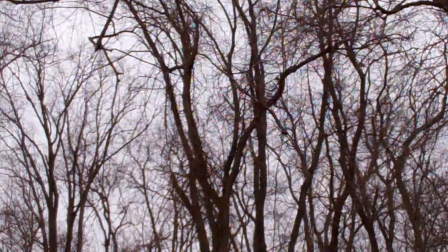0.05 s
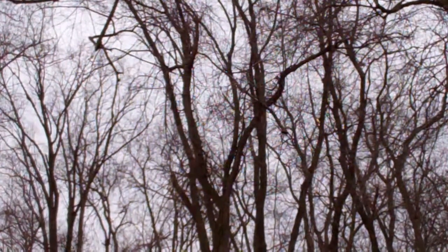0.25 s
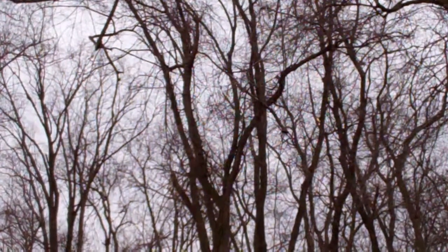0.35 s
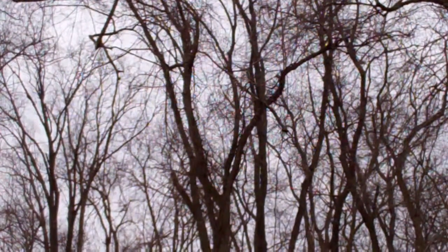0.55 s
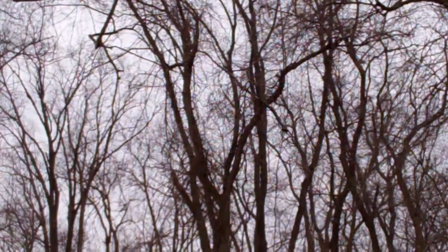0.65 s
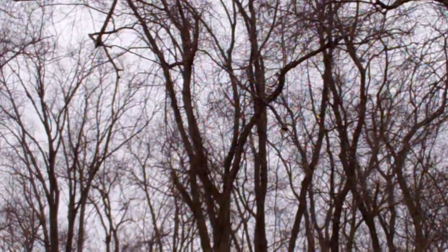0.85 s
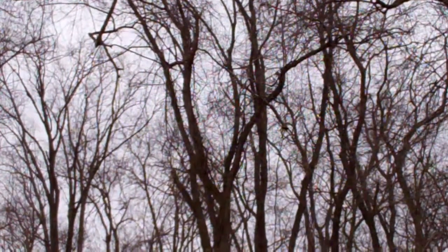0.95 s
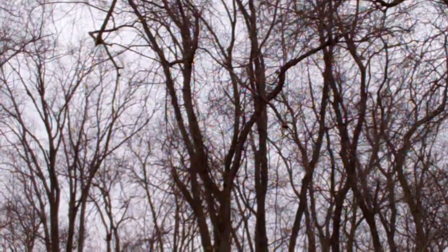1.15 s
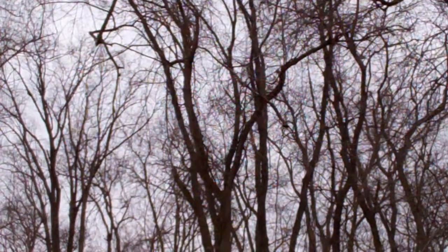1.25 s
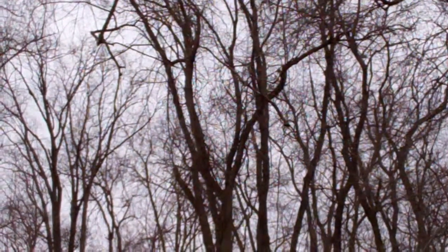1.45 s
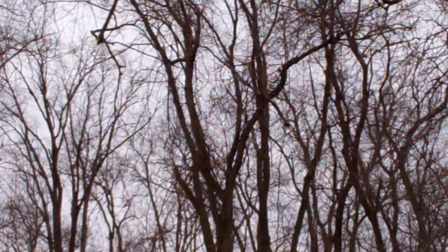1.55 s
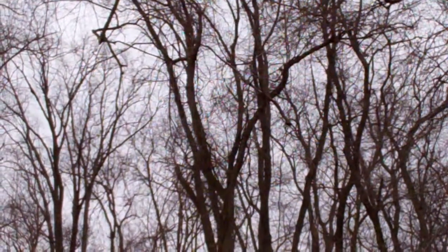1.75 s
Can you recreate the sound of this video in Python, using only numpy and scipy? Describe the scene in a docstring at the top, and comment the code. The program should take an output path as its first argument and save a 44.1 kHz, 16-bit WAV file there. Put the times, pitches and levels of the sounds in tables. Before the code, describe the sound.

A sharp plastic knock close to the microphone, over steady hiss and distant traffic, with faint birds

```python
"""A bare winter wood: traffic drone, microphone hiss and a thin whine run throughout, far bird notes now and then.
A seep and a faint chirp (bent sines) open; a tiny tick (noise burst) follows, then a knock on a hand-held
camera's plastic shell (driven resonances, ringing thin parts, noise cracks). A hoarse falling whistle
(fluttering sine) comes next; a far hollow tap (damped sines) falls within it. Then most of the chirps
and seeps call; the trunks echo every bird."""
import sys
import numpy as np
from scipy import signal
from scipy.fft import rfft, irfft, next_fast_len
from scipy.io import wavfile
from scipy.ndimage import uniform_filter1d, map_coordinates

SR = 44100
rng = np.random.default_rng(int(sys.argv[2]) if len(sys.argv) > 2 else 0)


def gain_from_db(level_db):
    """Turn a decibel level (scalar or array-like) into a linear amplitude factor."""
    decades = np.asarray(level_db, float) / 20
    return 10 ** decades


def store_pcm(level_fs):
    """Save levels as 16-bit WAV."""
    pcm = np.round(np.clip(level_fs, -1, 1) * 32767).astype(np.int16)
    wavfile.write(sys.argv[1], SR, np.atleast_2d(pcm).T)


N = 79380

# Broad shell resonances. Each row: centre in Hz, width in Hz, left gain in dB, right port over left in dB.
SHELL_MODES = [(340, 390, -13.5, -9), (693, 190, -22, -5.5)]
# Thin parts of the shell. Each row: pitch in Hz, left level in dB, t60 in s, right port over left in dB,
# relative sign of the first swing.
THIN_PARTS = [(1385, -36.5, .026, -1, 1), (1710, -38, .018, -7, 1), (2130, -33, .007, -8, -1),
              (3100, -43, .006, -2, 1), (4380, -42, .008, -9, 1), (5150, -37, .011, -12, -1),
              (5520, -41, .009, -12, 1), (12900, -31.5, .007, -15, 1), (13450, -32.5, .009, -15, -1),
              (13900, -38, .009, -15, 1), (14600, -37, .005, -15, -1)]
# Brittle cracks by the left port. Each row: time in s, relative peak level in dB, t60 in s, left over right in dB.
CRACKS = [(.0892, -39, .006, 14), (.2360, -32, .008, 14), (.2378, -43, .03, 10)]
# Crack spectrum. Each row: frequency in Hz, relative level in dB.
CRACK_SPECTRUM = [(1500, -10), (3000, -9), (3600, -16), (4300, -7), (5900, -9), (7000, -5), (7900, -10),
                  (8700, -4), (9800, -3), (10700, -9), (12300, -4), (13300, -3), (14300, -12), (15000, -13),
                  (15500, -40), (16000, -70)]
# Wooden modes of the tap. Each row: pitch in Hz, peak level in dB, t60 in s.
TAP_MODES = [(655, -41.5, .014), (930, -50, .01), (1300, -55, .006), (1840, -57, .006), (2440, -55, .006),
             (3000, -59, .004)]
# Whistle line. Each row: time in s, pitch in Hz, relative level in dB.
WHISTLE_LINE = [(.322, 3520, -72), (.355, 3535, -64), (.375, 3530, -67), (.4, 3470, -60), (.44, 3430, -60),
                (.485, 3395, -56), (.51, 3375, -63), (.545, 3360, -61), (.575, 3335, -56), (.6, 3310, -63),
                (.65, 3320, -62), (.7, 3270, -62), (.73, 3290, -70), (.76, 3290, -74), (.81, 3270, -67),
                (.87, 3330, -72)]
# Chirps. Each row: start in s, length in s, first, middle and last pitch in Hz, relative level in dB.
CHIRPS = [(.853, .018, 2550, 2350, 2600, -65), (.869, .018, 2600, 3050, 3550, -65),
          (.885, .025, 3580, 3600, 3400, -60), (.911, .025, 3450, 3600, 3350, -60),
          (.897, .036, 2950, 2750, 2950, -62), (.931, .01, 3000, 3170, 3450, -55),
          (.937, .014, 3450, 4150, 4600, -60), (.949, .024, 3800, 3980, 3600, -62),
          (.952, .016, 3000, 3300, 3500, -63), (.976, .02, 3850, 3950, 3900, -72),
          (.897, .027, 6500, 6200, 5730, -63), (.922, .015, 5720, 5900, 6550, -61),
          (.895, .025, 5800, 5650, 5700, -69), (1.268, .055, 2750, 3480, 3350, -62),
          (1.268, .022, 3500, 3750, 3850, -66), (1.292, .022, 4100, 4300, 4250, -67),
          (1.752, .034, 3550, 3350, 3200, -68), (1.78, .034, 3150, 3650, 4050, -65),
          (.07, .018, 3450, 3500, 3450, -70), (1.322, .035, 3450, 3400, 3300, -68)]
# Thin high seeps. Each row: start in s, length in s, first, middle and last pitch in Hz, relative level in dB.
SEEPS = [(.001, .011, 6000, 7300, 8200, -60), (.912, .011, 6500, 7550, 8350, -59),
         (1.488, .045, 8900, 8000, 7500, -64), (1.498, .047, 9500, 9350, 9100, -67),
         (1.52, .045, 9200, 8700, 8100, -62), (1.527, .018, 9400, 9000, 8500, -63),
         (1.708, .014, 7250, 7200, 7150, -70), (.52, .008, 7900, 7700, 7800, -66),
         (.528, .015, 9000, 11600, 10900, -63), (.532, .011, 11500, 13000, 12000, -63)]
# Overall gain in dB: chirps, seeps, whistle.
BIRD_GAIN_DB = [.5, .3, 1.2]
# Drone spectrum. Each row: frequency in Hz, relative level per Hz in dB.
DRONE_SPECTRUM = [(12, -35), (20, -16), (60, -11), (100, -7.5), (125, -3.5), (170, -6.5), (250, -7),
                  (399, -7.5), (460, -5.5), (520, -7.5), (678, -3.5), (850, -5.5), (1040, -8),
                  (1410, -12.5), (1560, -12.5), (2600, -22.5), (3380, -31), (5720, -120)]
# Fuzzy engine tones in the drone. Each row: centre in Hz, width in Hz, boost in dB.
ENGINE_TONES = [(81, 12, 4), (133, 6, 9), (167, 5.5, 7), (479, 12, 4)]
# Drone swell, used about its mean. Each row: time in s, relative level in dB.
DRONE_SWELL = [(0.0, -55), (0.42, -53), (0.7, -54.5), (0.986, -54.5), (1.8, -54.5)]
# Left-right likeness of the drone. Each row: frequency in Hz, correlation from 0 to 1.
DRONE_LIKENESS = [(40, 0.64), (130, 1), (300, 0.26), (640, 0.74), (1400, 0.63), (2500, 0.13)]
# Hiss spectrum. Each row: frequency in Hz, relative level per Hz in dB.
HISS_SPECTRUM = [(1180, -37), (2000, -11.5), (2260, -10), (2980, -3), (3160, -5.5), (3400, -4.5),
                 (6980, -7.5), (7830, -6), (9220, -7)]
# Channel balance of drone and hiss. Each row: frequency in Hz, left over right in dB.
NOISE_BALANCE = [(40, 4), (110, 10.5), (200, 7), (380, 7), (700, 9.5), (1280, 7.5), (2370, 5), (4370, 3),
                 (8060, 2.5), (14900, 11.5)]
# Whine of the electronics. Each row: pitch in Hz, level in dB rms.
WHINE_TONES = [(7852, -77), (7882, -78)]

KNOCK_S, LOAD_S, LOAD_SHARE, BLOW_S = .23535, .0022, .45, .0013  # load share: peak load over peak blow
THIN_PARTS_DELAY_S = .0004
TAP_S, TAP_RISE_S, TAP_PAN_DB = .6843, .0038, 10
WHISTLE_ROUGH, WHISTLE_FLUTTER_PER_S, WHISTLE_CLEAN_S = .8, 240, .16
WHISTLE_PAN_DB, CHIRP_PAN_DB, SEEP_PAN_DB = 9, 12.5, 18
WHISTLE_LAG_S, CHIRP_LAG_S, SEEP_LAG_S = .00017, .0001, .00005
TRUNK_S, TRUNK_DB, WOOD_T60_S, WOOD_DB = .034, -12, .22, -5.5
SHEEN_S, SHEEN_LENGTH_S, SHEEN_HZ, SHEEN_WIDTH_HZ, SHEEN_DB = .895, .075, 12900, 700, -66
DRONE_DB, HISS_DB, NOISE_TOP_HZ, NOISE_LAG_S = -54.4, -59, 14200, .0001
TOP_HZ = 15600


def unit(x):
    """Scales to rms 1."""
    return x / np.sqrt(np.mean(x ** 2) + 1e-20)


def along(points, hz):
    """Interpolates (Hz, value) points on a log frequency axis."""
    f, v = np.transpose(points)
    return np.interp(np.log(hz + 1), np.log(f + 1), v)


def wobble(knots_per_s):
    """Smooth random curve through normal random knots."""
    knots = rng.standard_normal(int(N * knots_per_s / SR) + 4)
    return map_coordinates(knots, [np.arange(N) * knots_per_s / SR])


def filtered(x, response):
    """Multiplies the spectrum of x by a complex response of frequency."""
    m = next_fast_len(N + SR // 2)
    return irfft(rfft(x, m) * response(np.fft.rfftfreq(m, 1 / SR)), m)[..., :N]


def panned(x, left_db):
    """Pans by level, left_db left over right; the channel mean stays x."""
    gains = gain_from_db(np.array([[left_db / 2], [-left_db / 2]]))
    return x * gains / gains.mean()


def late(x, lag_s):
    """Delays the right channel by lag_s: a longer path to that port."""
    return filtered(x, lambda hz: np.exp(-2j * np.pi * hz * [[0], [lag_s]]))


def knock():
    """Shell is loaded, then snaps back in one short blow: broad modes filter the force, thin parts ring freely."""
    u = np.arange(N) / SR - KNOCK_S
    load = LOAD_SHARE * np.clip(1 + u / LOAD_S, 0, 1) ** 2 * (u < 0)
    blow = np.sin(np.pi * np.clip(u / BLOW_S, 0, 1)) ** 2

    def resonances(f):
        return sum(gain_from_db([[db], [db + right_db]]) * 1j * f * width / (centre ** 2 - f ** 2 + 1j * f * width)
                   for centre, width, db, right_db in SHELL_MODES)

    body = filtered(load - blow, resonances)
    u = np.maximum(u - THIN_PARTS_DELAY_S, 0)
    thin = sum(sign * gain_from_db([[db], [db + right_db]]) * gain_from_db(-60 * u / t60) * np.sin(2 * np.pi * hz * u)
               for hz, db, t60, right_db, sign in THIN_PARTS)
    return body - thin


def cracks():
    """Brittle snaps: bright noise bursts, 0.4 ms rise, exponential decay."""
    t = np.arange(N) / SR
    noise = filtered(rng.standard_normal((2, N)),
                     lambda hz: gain_from_db(along(CRACK_SPECTRUM, hz) - 40 * (hz < 900)))
    bursts = 0
    for start, db, t60, left_db in CRACKS:
        rise = np.clip((t - start) / .0004 + 1, 0, 1)
        decay = gain_from_db(db - 6 - 60 * np.abs(t - start) / t60)
        bursts = bursts + panned(decay * rise, left_db)
    return bursts * unit(noise)


def tap():
    """Soft hollow tap: wooden modes swell during the contact, then decay fast."""
    u = np.maximum(np.arange(N) / SR - TAP_S, 0)
    after = np.maximum(u - TAP_RISE_S, 0)
    ring = sum(gain_from_db(db - 60 * after / t60) * np.sin(2 * np.pi * hz * u) for hz, db, t60 in TAP_MODES)
    contact = np.sin(np.pi / 2 * np.minimum(u / TAP_RISE_S, 1))
    return panned(ring * contact, TAP_PAN_DB)


def whistle():
    """Long hoarse falling note: a sine whose size and phase flutter, roughening from a clean start."""
    t = np.arange(N) / SR
    s, hz, db = np.transpose(WHISTLE_LINE)
    edge = np.interp(t, [s[0], s[0] + .0069, s[-1] - .02, s[-1]], [0, 1, 1, 0])
    flutter = (wobble(WHISTLE_FLUTTER_PER_S) + 1j * wobble(WHISTLE_FLUTTER_PER_S)) / np.sqrt(2)
    rough = WHISTLE_ROUGH * (1 - np.exp(-np.abs(t - s[0]) / WHISTLE_CLEAN_S))
    voice = np.sqrt(1 - rough) + np.sqrt(rough) * flutter
    phase = 2 * np.pi * np.cumsum(np.interp(t, s, hz)) / SR
    return edge * gain_from_db(np.interp(t, s, db) + 6) * np.real(voice * np.exp(1j * phase))


def notes(rows):
    """Short bird notes: sines on parabolic pitch lines under a rounded swell, levels fluttering."""
    out = np.zeros(N + SR)
    for start, length, first, middle, last, db in rows:
        u = np.linspace(0, 1, round(length * SR))
        hz = np.polyval(np.polyfit([0, .5, 1], [first, middle, last], deg=2), u)
        swell = np.abs(np.sin(np.pi * u)) ** .5
        tone = np.sin(2 * np.pi * np.cumsum(hz) / SR)
        out[round(start * SR):][:len(u)] += gain_from_db(db + 6.5) * swell * tone
    return out[:N] * gain_from_db(.72 * wobble(121.4))


def sheen():
    """Faint breathy treble during the loudest chirps: narrow-band noise under a swell."""
    u = np.clip((np.arange(N) / SR - SHEEN_S) / SHEEN_LENGTH_S, 0, 1)
    air = filtered(rng.standard_normal(N), lambda hz: np.exp(-((hz - SHEEN_HZ) / SHEEN_WIDTH_HZ) ** 2))
    return panned(gain_from_db(SHEEN_DB) * np.abs(np.sin(np.pi * u)) ** .33 * unit(air), left_db=18)


def wood(x):
    """Trunks return one clear echo and a decaying scatter, the scatter independent per port."""
    t = np.arange(SR // 2) / SR
    tail = rng.standard_normal((2, len(t))) * gain_from_db(-60 * t / WOOD_T60_S) * (t > .004)
    tail *= gain_from_db(WOOD_DB) / np.linalg.norm(tail[0])
    tail[:, round(TRUNK_S * SR)] += gain_from_db(TRUNK_DB)
    return x + signal.fftconvolve(x, tail, axes=1)[:, :N]


def rush(spectrum, likeness, patchy_db):
    """Shaped stereo noise with random gain patches in time and frequency; channel mean has rms 1."""
    z = signal.stft(rng.standard_normal((2, N)), nperseg=512)[2]
    field = uniform_filter1d(rng.standard_normal(z.shape[1:]), size=6, axis=0)
    field = uniform_filter1d(field, size=10, axis=1)
    pair = signal.istft(z * gain_from_db(patchy_db * unit(field)), nperseg=512)[1][:, :N]

    def mid_side(hz):
        angle = np.arccos(np.clip(along(likeness, hz), -1, 1)) / 2
        return gain_from_db(along(spectrum, hz)) * [np.cos(angle), np.sin(angle)]

    def balance(hz):
        lag = np.exp(-2j * np.pi * hz * NOISE_LAG_S * [[0], [1]])
        return gain_from_db(along(NOISE_BALANCE, hz) * [[.5], [-.5]]) * lag

    mid, side = filtered(pair, mid_side)
    out = filtered(np.array([mid + side, mid - side]), balance)
    return out / np.std(out.mean(0))


def traffic():
    """Far traffic: low noise with engine-tone bands boosted, under a slow swell."""
    def engine(f):
        return gain_from_db(sum(db * np.exp(-((f - centre) / width) ** 2) for centre, width, db in ENGINE_TONES))

    s, db = np.transpose(DRONE_SWELL)
    swell_db = np.interp(np.arange(N) / SR, s, db - db.mean())
    drone = filtered(rush(DRONE_SPECTRUM, DRONE_LIKENESS, patchy_db=1), engine)
    return gain_from_db(DRONE_DB + swell_db + .27 * wobble(8.16)) * drone


def hiss():
    """Microphone hiss: treble noise, nearly independent per channel."""
    return gain_from_db(HISS_DB) * rush(HISS_SPECTRUM, [(3000, .04)], patchy_db=.77)


def whine():
    """Electronics whine: two close sines, level and phase unsteady."""
    t = np.arange(N) / SR
    tones = sum(gain_from_db(db + 3 + 1.5 * wobble(23.8)) * np.sin(2 * np.pi * hz * t + .5 * wobble(38))
                for hz, db in WHINE_TONES)  # +3 dB: rms to peak
    return late(panned(tones, left_db=21), lag_s=.00004)


def background():
    """Sums band-limited traffic and hiss with the whine."""
    return filtered(traffic() + hiss(), lambda hz: hz < NOISE_TOP_HZ) + whine()


def scene():
    """Near sounds and sheen dry, birds placed by level and lag, then echoed by the wood."""
    voices = [notes(CHIRPS), notes(SEEPS), whistle()]
    pans_db = [CHIRP_PAN_DB, SEEP_PAN_DB, WHISTLE_PAN_DB]
    lags_s = [CHIRP_LAG_S, SEEP_LAG_S, WHISTLE_LAG_S]
    birds = sum(late(panned(gain_from_db(db) * voice, pan_db), lag_s)
                for voice, db, pan_db, lag_s in zip(voices, BIRD_GAIN_DB, pans_db, lags_s))
    return background() + knock() + cracks() + tap() + wood(birds) + sheen()


def band_limit(x):
    """A steep low-pass at the top of the band."""
    return signal.sosfilt(signal.butter(12, 15470, fs=SR, output="sos"), x)


def record(dry):
    """Cuts everything from TOP_HZ up: the camera's band limit."""
    mix = filtered(dry, lambda hz: hz < TOP_HZ)
    return band_limit(mix)


dry = scene()
out = record(dry)
store_pcm(out)
```